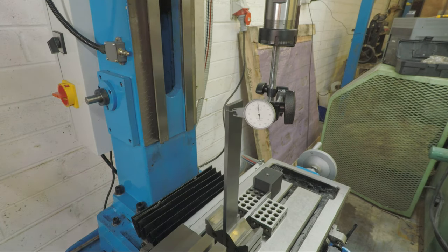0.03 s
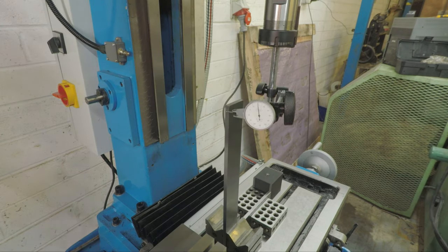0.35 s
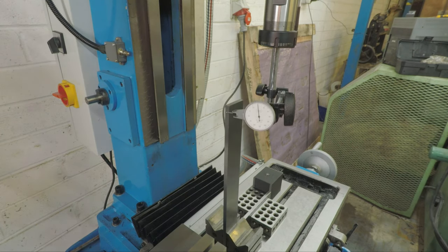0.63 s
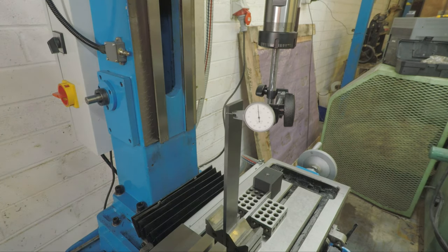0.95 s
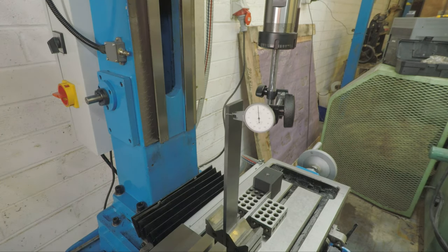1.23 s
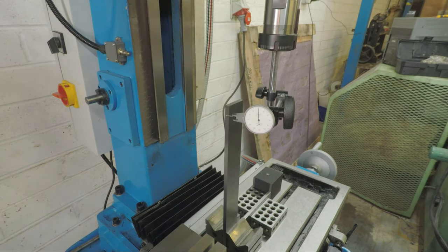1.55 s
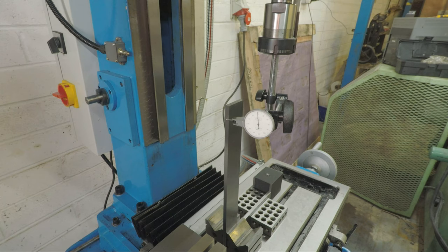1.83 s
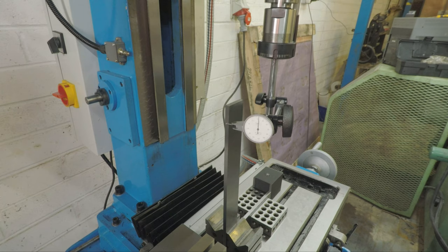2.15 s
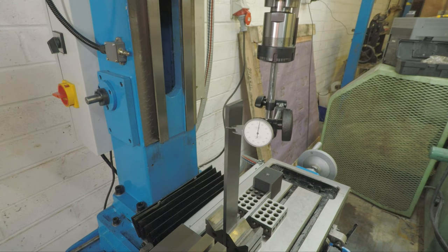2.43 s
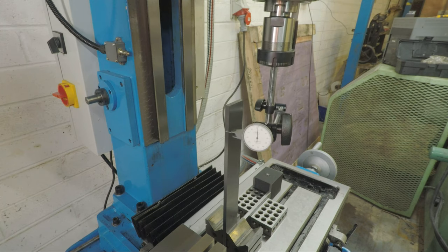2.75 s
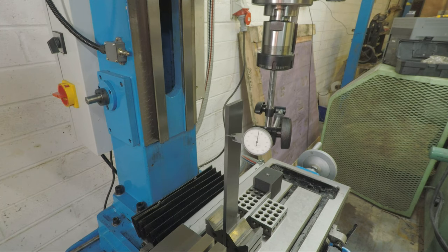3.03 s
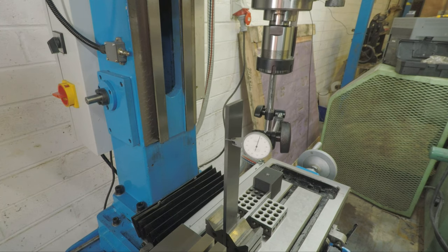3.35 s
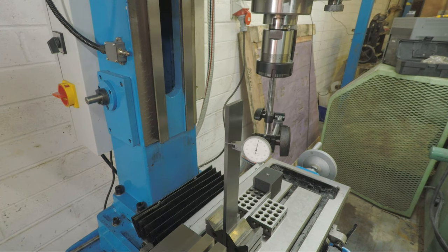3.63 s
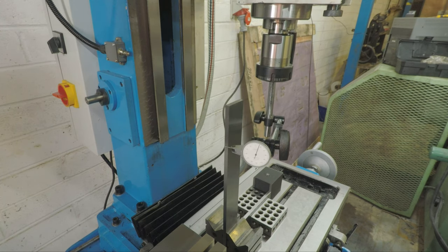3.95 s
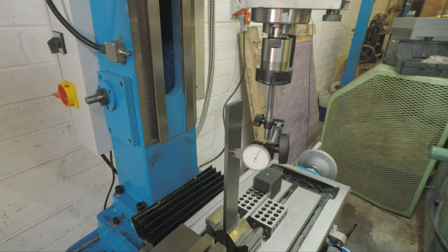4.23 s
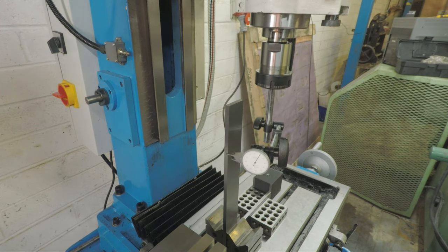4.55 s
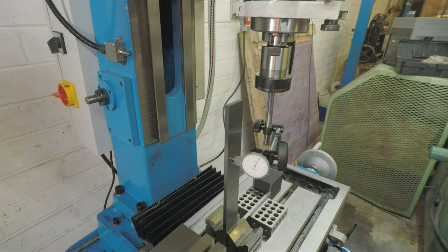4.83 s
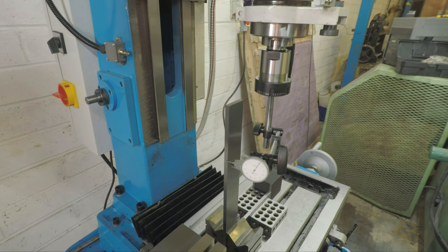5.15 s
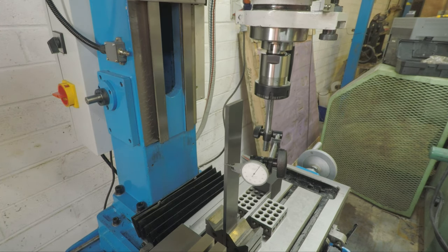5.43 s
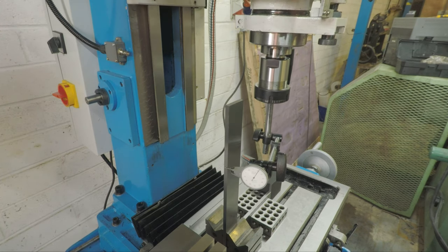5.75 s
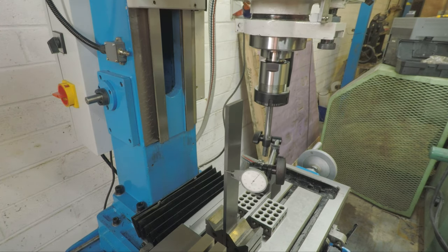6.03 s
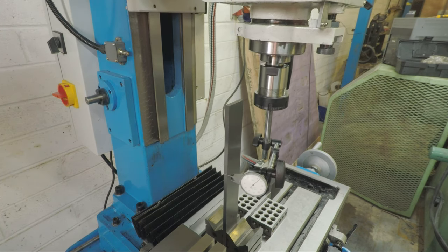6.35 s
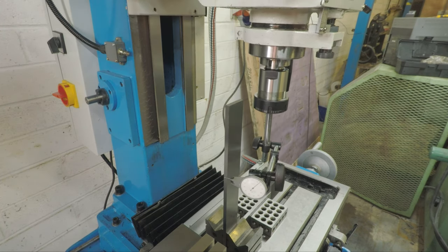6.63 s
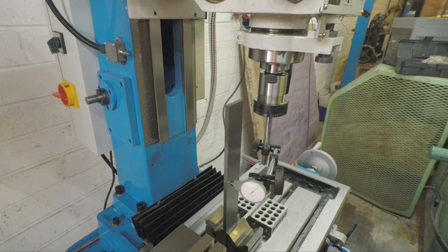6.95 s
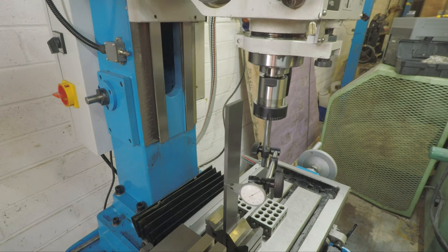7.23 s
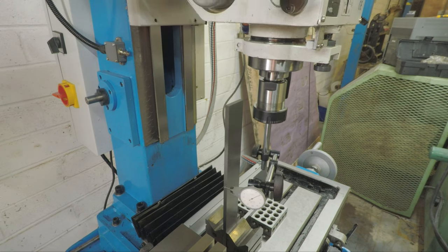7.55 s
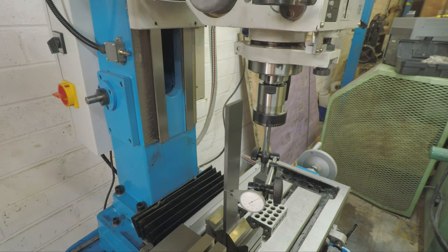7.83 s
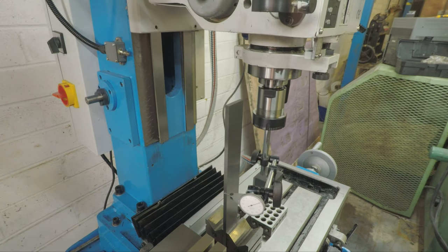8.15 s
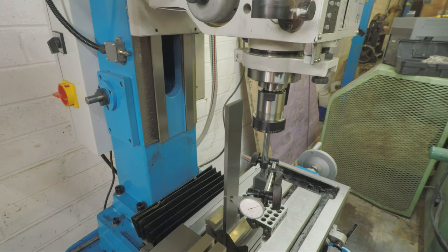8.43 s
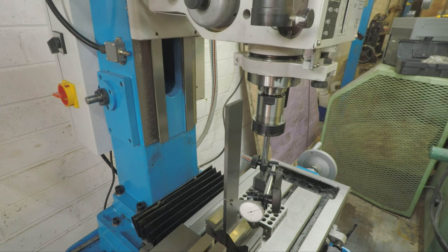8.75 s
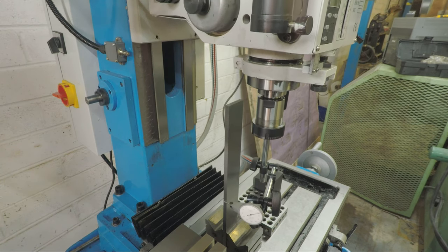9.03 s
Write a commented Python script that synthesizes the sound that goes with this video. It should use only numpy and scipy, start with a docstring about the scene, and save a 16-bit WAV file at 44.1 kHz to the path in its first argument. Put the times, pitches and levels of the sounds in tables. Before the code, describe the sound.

A brief droning scrape of a metal slide fades, and an electric motor drives a milling head down with a throbbing gear whine.

```python
"""A milling machine's motor drives the head down the column; the sound opens on a slide rubbing along its ways.
Slide friction rings the table, drones, squeaks and knocks, then dies down. At 1.5 s the scene changes to the
running motor. Its gears grind through the ringing castings, throbbing with each turn of motor and lead screw.
Backlash ticks, the drive whines and whistles, and the column rumbles under a quick, low warble."""
import sys
import numpy as np
from scipy import signal
from scipy.fft import rfft, irfft, next_fast_len
from scipy.io import wavfile

SR = 44100
rng = np.random.default_rng(int(sys.argv[2]) if len(sys.argv) > 2 else 0)


def dump(signal):
    """Clip the signal to [-1, 1] and save it as 16-bit WAV at the path in sys.argv[1]."""
    limited = np.clip(np.atleast_2d(signal).T, -1, 1)
    pcm = np.round(limited * 32767).astype(np.int16)
    wavfile.write(sys.argv[1], SR, pcm)


N = 409821
TIME_S = np.arange(N) / SR
MOTOR_START_S = 1.51
TRAVEL = np.clip((TIME_S - MOTOR_START_S) / (N / SR - MOTOR_START_S), 0, 1)  # head: 0 high, 1 low
GEAR_RATIO = 3.588  # motor turns per screw turn

# Rubbing effort. Each row: time in seconds, level in dB.
EFFORT = [(0, -0.7), (.3, -0.5), (.47, -0.8), (.65, -4), (.85, -8), (1.2, -12), (1.35, -11), (1.5, -14)]
# Table resonances. Each row: frequency in Hz, width in Hz, relative level in dB.
TABLE_MODES = [(286, 29, -10), (315, 29, -5.5), (398, 44, -5.5), (442.7, 40.5, 0.5), (519.3, 41, -4),
               (605, 81, -14.5), (681, 88, -12.5), (1150, 68, -18)]
# The slide lets go. Each row: centre in seconds, half length in seconds, drone dip in dB.
DRONE_BREAKS = [(0.467, 0.0097, 18), (.57, 0.046, 7), (0.814, 0.033, 7)]
# Slide knocks. Each row: start in seconds, peak in dB, top mode boost in dB, damping factor.
KNOCKS = [(0.226, -26, 0, 1.2), (.402, -26, 0, .8), (.426, -20, 0, 1.6), (.481, -30, 7, .6),
          (0.62, -29, 8, .6), (1.162, -35.5, 0, 2.2)]
# Motor speed. Each row: time in seconds, turns per second.
MOTOR_SPEED = [(1.5, 25.404), (2.5, 25.095), (3.5, 25.464), (4.5, 25.341), (5.5, 25.58), (6.5, 25.637),
               (7.5, 25.628), (8.5, 25.773), (9.3, 25.696)]
# Gear load and whine over one turn. Each row: phase in turns, relative level in dB.
SHAFT_LOAD = [(.03, 0.5), (.28, 5.5), (.5, -3.3), (.78, -2.4)]
SCREW_LOAD = [(.03, .5), (.2, 3.5), (.3, 2.5), (.42, 3.3), (.6, 4), (.78, 2.95), (.9, -0.5)]
WHINE_SWELL = [(.08, 5.5), (.25, 3), (.45, -9.5), (.65, 0.5), (.78, 0), (.87, -4.5)]
# Tight spots of the screw. Each row: phase in turns, relative clash strength in dB.
TIGHT_SPOTS = [(.3, 3), (.61, -1)]
# One-off tooth clashes. Each row: time in seconds, relative strength in dB.
HARD_CLASHES = [(3.018, 4.5), (5.137, 5), (5.182, 4.5), (6.12, 1), (6.582, 4.5), (6.857, 4.5), (7.797, 3.5),
                (9.192, 1.5)]
# Head and column resonances. Each row: frequency in Hz, width in Hz, head-high dB, head-low dB.
CASTING_MODES = [(1125,91,-56.5,-66.5), (1280,23,-68.5,-65), (1390,73,-60,-57.5), (1475,39,-61,-60.5),
                 (1585,46.5,-53.5,-56), (1905,19,-60,-65), (1999,73,-53,-58), (2134,100,-50.5,-63.5),
                 (2203,74,-54,-76), (2400,110,-53.5,-61.5), (2436,62,-59.5,-63.5), (2620,140,-52,-62),
                 (2796,29,-60.5,-76.5), (2907,48,-67,-62.5), (3102,110,-63,-69), (3415,143,-62,-65),
                 (3645,95,-67.5,-74), (4530,350,-73.5,-78.5), (4836,220,-77,-77), (5375,200,-76.5,-78.5),
                 (5810,74,-67,-75.5), (6800,290,-81,-83)]
# Mesh chirps. Each row: frequency in Hz, width in Hz, level in dB, centre and half length in seconds.
CHIRPS = [(5620, 450, -67.5, 4.8, 1.7), (6800, 130, -78, 7.83, 0.21)]
# Motor tones. Each row: frequency in Hz, head-high level in dB, head-low level in dB.
MOTOR_TONES = [(385.3, -72, -75), (457.7, -76, -67.5), (503, -71, -72.5), (617, -80, -73), (693, -85, -70),
               (970, -73, -86), (1505, -74, -64)]
# Whistles. Each row: pitch in Hz, wobble in Hz, level in dB, centre and half length in seconds.
WHISTLES = [(6800, 9.3, -81, 1.9, 2.52), (7750, 10, -76, 8, 0.34), (9800, 15, -91, 4, 4),
            (9800, 15, -79, 2.7, 0.97), (10850, 30, -73, 1.7, 1.1), (10920, 65, -76, 2.4, 3.8),
            (11068, 65, -78, 2.9, 1), (11400, 45, -79, 3.5, 1.4), (11789, 55, -81, 2.8, 2.8),
            (10777, 25, -83.5, 7.06, 4.3), (11300, 65, -82, 8.2, 2), (13100, 25, -98, 6, 3),
            (13964, 10, -90, 8.7, 1), (14180, 12, -97, 2.6, 1), (14750, 15, -100, 6.5, 2.5)]
# Column surges. Each row: centre and half length in seconds, rumble rise in dB, shudder rise in dB.
SURGES = [(1.55, 0.091, 4, 8), (2.672, 0.033, 4.5, 13), (5.65, 0.36, -1, 3), (6.483, 0.081, 2.5, 8),
          (8.424, .16, 2, 5)]
# One warble cycle. Each row: phase in cycles, pitch in Hz, relative level in dB.
WARBLE_CYCLE = [(0, 379, -25), (.15, 374.3, 5.5), (.27, 335, -3), (.38, 289.8, 5.5), (.55, 288, 0.5),
                (.72, 292.6, -5.5), (0.998, 297.2, -17)]
# Warbling stretches. Each row: start and end in seconds, start and end level in dB.
WARBLE_SPANS = [(1.45, 4.302, -57, -60.5), (7.295, 9.4, -60.5, -56.5)]
# Noise spectra. Each row: frequency in Hz, relative density in dB.
SLIDE_BASS_SPECTRUM = [(25, -34), (45, -41), (70, -0.5), (120, 1), (190, 4.5), (260, 5.5), (500, 2.5),
                       (800, -17), (1200, -47)]
SLIDE_HISS_SPECTRUM = [(440, -26), (750, -4.5), (1170, -3.5), (1500, -5.5), (2020, -6.5), (2220, -1),
                       (2400, -3.5), (2700, -5), (3050, -2.5), (3600, -7), (5000, -9.5), (10400, -23),
                       (15500, -43)]
GRIND_SPECTRUM = [(450, -48), (750, -14), (1000, -6), (1500, 1), (2500, -10.5), (4000, -11), (7000, -20.5),
                  (8200, -23.5), (12000, -50)]
MOTOR_HISS_SPECTRUM = [(300, -17), (900, 17.5), (1500, 11), (3000, 1.5), (6500, 3), (8500, -2.5),
                       (11500, -3.5), (12800, -11), (15400, -17)]
TICK_SPECTRUM = [(700, -32), (1400, 4), (2400, 4.5), (3400, -2), (4100, -16.5), (5000, -13), (5700, -6),
                 (6200, -14.5), (7200, -10.5), (8000, -24.5), (12000, -31)]
RUMBLE_SPECTRUM = [(25, -48), (44, -46), (58, -36), (72, -19), (100, -3.5), (220, 2), (280, -3), (400, -7),
                   (480, -8), (600, -8.5), (800, -14), (1200, -45.5)]
SHUDDER_SPECTRUM = [(25, -42), (44, -46), (58, -30), (75, 2.5), (110, 9), (150, 0), (220, -15), (400, -43)]


def gain(db):
    """Decibels to amplitude."""
    return 10 ** (np.asarray(db) / 20)


def unit_rms(x):
    """Scales to rms 1."""
    return x / np.sqrt(np.mean(x ** 2) + 1e-20)


def follow(rows):
    """A time curve at every sample."""
    return np.interp(TIME_S, *np.transpose(rows))


def per_turn(turns, rows):
    """A curve that repeats every turn."""
    return np.interp(turns, *np.transpose(rows), period=1)


def by_travel(high, low):
    """Linear blend as the head sinks."""
    return high + (low - high) * TRAVEL


def swell(centre_s, half_s):
    """Gaussian bell, peak 1."""
    return np.exp(-.5 * ((TIME_S - centre_s) / half_s) ** 2)


def sine(pitch_hz):
    """Sine with a per-sample pitch."""
    return np.sin(2 * np.pi * np.cumsum(pitch_hz) / SR)


def noise():
    """White noise."""
    return rng.standard_normal(N)


def wander(cutoff_hz):
    """Slow random drift, rms 1."""
    size = next_fast_len(N, True)
    lowpass = np.exp(-(np.fft.rfftfreq(size, 1 / SR) / cutoff_hz) ** 2)
    return unit_rms(irfft(rfft(rng.standard_normal(size)) * lowpass, size)[:N])


def colour(x, spectrum):
    """Filters x by a spectrum, rms 1."""
    size = next_fast_len(N)
    hz, db = np.transpose(spectrum)
    shape_db = np.interp(np.log(np.fft.rfftfreq(size, 1 / SR) + 1), np.log(hz), db)
    return unit_rms(irfft(rfft(x, size) * gain(shape_db), size)[:N])


def ring(x, hz, width_hz):
    """Two equal resonators in series, rms 1."""
    b, a = signal.iirpeak(hz, hz / width_hz, fs=SR)
    return unit_rms(signal.lfilter(b, a, signal.lfilter(b, a, x)))


def slide(body_db=-36, bass_db=-42, drone_db=-36, hiss_db=-45, drone_hz=224):
    """Friction rings the table, drones and hisses along the ways; all fade as the effort drops."""
    effort_db = follow(EFFORT)
    body = unit_rms(sum(gain(db) * ring(noise(), hz, width_hz) for hz, width_hz, db in TABLE_MODES))
    pitch_hz = drone_hz * (1 + 0.0124 * wander(26))
    drone = unit_rms(sine(pitch_hz) * gain(0.5 * wander(25)))
    breaks_db = sum(dip_db * swell(centre_s, half_s) for centre_s, half_s, dip_db in DRONE_BREAKS)
    judder_db = 1.5 * wander(14)
    return (gain(body_db + effort_db + judder_db - 0.2 * breaks_db) * body
            + gain(bass_db + 1.08 * effort_db) * colour(noise(), SLIDE_BASS_SPECTRUM)
            + gain(drone_db + 1.15 * effort_db - breaks_db) * drone
            + gain(hiss_db + effort_db) * colour(noise(), SLIDE_HISS_SPECTRUM))


def squeak(squeak_hz=2168, level_db=-59, pulse_hz=8, pulse_peak_s=1.07, swing_db=6):
    """The slide squeaks in faint pulses that weaken with the effort."""
    pulse_db = swing_db * np.cos(2 * np.pi * pulse_hz * (TIME_S - pulse_peak_s))
    pitch_hz = squeak_hz * (1 + 0.0058 * wander(41))
    return gain(level_db + 0.46 * follow(EFFORT)) * unit_rms(gain(pulse_db) * sine(pitch_hz))


def knocks():
    """Dull blows ring the table modes; some last longer and sound brighter."""
    age_s = np.arange(SR // 4) / SR
    out = np.zeros(N)
    for start_s, peak_db, bright_db, damping in KNOCKS:
        modes = []
        for hz, width_hz, db in TABLE_MODES:
            envelope = width_hz * age_s * np.exp(-np.pi * width_hz * damping * age_s)
            modes.append(gain(db) * envelope * np.sin(2 * np.pi * (hz * age_s + rng.random())))
        blow = sum(modes[:-1]) + gain(bright_db) * modes[-1]
        out[round(start_s * SR):][:len(blow)] += gain(peak_db) * blow / abs(blow).max()
    return out


def motor_turns():
    """Motor shaft angle in turns."""
    return np.cumsum(follow(MOTOR_SPEED)) / SR


def screw_load_db():
    """Gear load from the turning lead screw."""
    return per_turn(motor_turns() / GEAR_RATIO, SCREW_LOAD)


def tooth_clashes():
    """(seconds, dB) pairs: one-off clashes, plus one per tight spot passed, harder under shaft load."""
    turns = motor_turns()
    clashes = list(HARD_CLASHES)
    for phase, db in TIGHT_SPOTS:
        at_turns = (np.arange(1, int(turns[-1] / GEAR_RATIO)) + phase) * GEAR_RATIO
        strength_db = db + 0.29 * per_turn(at_turns, SHAFT_LOAD)
        clashes += zip(np.interp(at_turns, turns, TIME_S), strength_db)
    return clashes


def gear_load_db(clashes, roughness_db=1.76, clash_s=.009):
    """The mesh tightens with each motor turn and screw turn, and jumps when teeth clash."""
    cyclic_db = per_turn(motor_turns(), SHAFT_LOAD) + screw_load_db()
    bite = by_travel(0.47, 0.7)  # more uneven with the head low
    load = unit_rms(gain(bite * cyclic_db + roughness_db * wander(90)))
    age = np.arange(SR // 20) / SR / clash_s
    burst = np.sqrt(2 * age * np.exp(1 - 2 * age))  # quick rise, slower fall
    for at_s, db in clashes:
        span = load[round((at_s - clash_s / 2) * SR):][:len(burst)]
        span[:] = np.maximum(span, gain(db + 1.5) * burst[:len(span)])
    return 20 * np.log10(load)


def geared_motor(clashes, grind_db=-58, hiss_db=-60):
    """The motor hisses; its gears grind, chirp and ring the castings, whose balance shifts with travel."""
    load_db = gear_load_db(clashes)
    scrape_db = load_db + 0.9 * screw_load_db()  # strongest where the screw binds
    out = gain(grind_db - 2 * TRAVEL) * colour(gain(scrape_db) * noise(), GRIND_SPECTRUM)
    out += gain(hiss_db - 1.5 * TRAVEL) * colour(noise(), MOTOR_HISS_SPECTRUM)
    for hz, width_hz, high_db, low_db in CASTING_MODES:
        throb_depth = (hz / 2300) ** 0.65  # treble throbs most
        excitation = gain(load_db * throb_depth) * noise()
        out += gain(by_travel(high_db, low_db)) * ring(excitation, hz, width_hz)
    for hz, width_hz, db, centre_s, half_s in CHIRPS:
        excitation = gain(1.5 * scrape_db) * noise()
        out += gain(db) * swell(centre_s, half_s) * ring(excitation, hz, width_hz)
    return out


def backlash_ticks(clashes, level_db=-56, fall_db=2.5, decay_s=.0055, phase_turns=.18, jitter_turns=.04):
    """Backlash closes once a motor turn, hardest where the screw binds; clashing teeth tick too."""
    turns = motor_turns()
    count = int(turns[-1])
    at_turns = np.arange(count) + phase_turns + jitter_turns * rng.standard_normal(count)
    binding_db = 3.44 * per_turn(at_turns / GEAR_RATIO, SCREW_LOAD)
    blows, jolts = np.zeros((2, N))
    blows[np.searchsorted(turns, at_turns).clip(0, N - 1)] = gain(binding_db)
    for at_s, db in clashes:
        jolts[round((at_s - decay_s / 2) * SR)] = gain(db + 7)
    pole = np.exp(-1 / (decay_s * SR))
    envelope = signal.lfilter([1], [1, -pole], [blows, jolts]).max(axis=0)
    return gain(level_db - fall_db * TRAVEL) * colour(envelope * noise(), TICK_SPECTRUM)


def whine(whine_hz=1122, top_db=-50.5, fade_from_s=2.48, fall_db_per_s=3.5):
    """A wavering drive note swells twice per screw turn; it holds, then fades as the head sinks."""
    swell_db = per_turn(motor_turns() / GEAR_RATIO, WHINE_SWELL) + 1.2 * wander(28)
    pitch_hz = whine_hz * (1 + 0.00444 * wander(27.6))
    level_db = top_db - fall_db_per_s * np.maximum(TIME_S - fade_from_s, 0)
    return gain(level_db) * unit_rms(gain(swell_db) * sine(pitch_hz))


def motor_tones(width_hz=4):
    """Faint tones of the running motor, steady in pitch."""
    return sum(gain(by_travel(high_db, low_db)) * ring(noise(), hz, width_hz)
               for hz, high_db, low_db in MOTOR_TONES)


def whistles(drift_hz=4, flutter_db=1.5):
    """Thin whistles wobble once per motor turn, and come and go along the travel."""
    flutter = gain(flutter_db * wander(35))
    turns = motor_turns()
    out = np.zeros(N)
    for hz, wobble_hz, db, centre_s, half_s in WHISTLES:
        wobble = np.sin(2 * np.pi * (turns + rng.random()))
        pitch_hz = hz + wobble_hz * wobble + drift_hz * wander(20)
        out += gain(db) * swell(centre_s, half_s) * unit_rms(flutter * sine(pitch_hz))
    return out


def column(rumble_db=-56, hum_db=-64):
    """The column rumbles with a few surges, hums in mid travel and shudders toward the bottom."""
    shudder_db = by_travel(-76, -64)
    for centre_s, half_s, rumble_rise_db, shudder_rise_db in SURGES:
        surge = swell(centre_s, half_s)
        rumble_db += rumble_rise_db * surge
        shudder_db += shudder_rise_db * surge
    hum = gain(hum_db) * swell(centre_s=4.5, half_s=1.43) * ring(noise(), hz=248, width_hz=22)
    rumble = gain(rumble_db) * colour(noise(), RUMBLE_SPECTRUM)
    shudder = gain(shudder_db) * colour(noise(), SHUDDER_SPECTRUM)
    return rumble + shudder + hum


def warble(rate_hz=10.16, origin_s=1.507, fade_s=0.033):
    """A low note swoops down about ten times a second, early and late in the travel."""
    phase = (TIME_S - origin_s) * rate_hz % 1
    phases, hz, db = np.transpose(WARBLE_CYCLE)
    pitch_hz = np.interp(phase, phases, hz) * (1 + 0.0243 * wander(44))
    note = gain(np.interp(phase, phases, db) + 0.2 * wander(10)) * sine(pitch_hz)
    envelope = np.zeros(N)
    for start_s, end_s, start_db, end_db in WARBLE_SPANS:
        gate = np.clip(np.minimum(TIME_S - start_s, end_s - TIME_S) / fade_s, 0, 1)
        envelope += gate * gain(follow([(start_s, start_db), (end_s, end_db)]))
    return envelope * unit_rms(note)


def scene(crossfade_s=.002):
    """The scene changes abruptly from the rubbing slide to the running motor; mono."""
    running = np.clip((TIME_S - MOTOR_START_S) / crossfade_s, 0, 1)
    sliding = slide() + squeak() + knocks()
    clashes = tooth_clashes()
    drive = geared_motor(clashes) + backlash_ticks(clashes)
    drive += whine() + motor_tones() + whistles() + column() + warble()
    return ((1 - running) * sliding + running * drive)[None]


def record(dry):
    """Steep low-pass at 15.7 kHz."""
    lowpass = signal.firwin(2047, 15700, window=("kaiser", 9), fs=SR)
    return signal.oaconvolve(dry, lowpass[None], "same")


dry = scene()
out = record(dry)
dump(out)
```